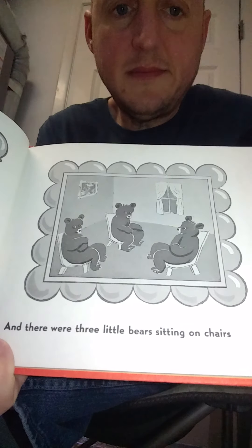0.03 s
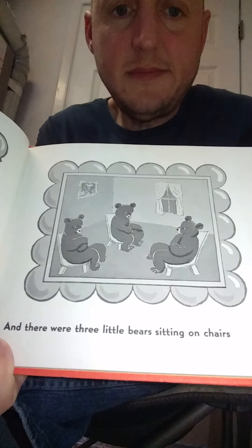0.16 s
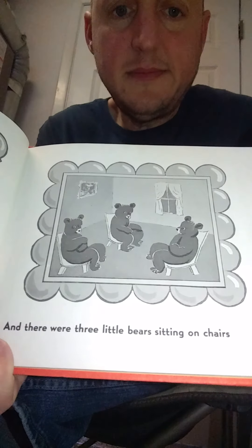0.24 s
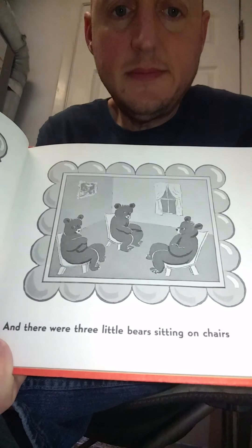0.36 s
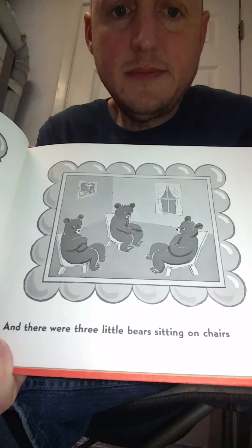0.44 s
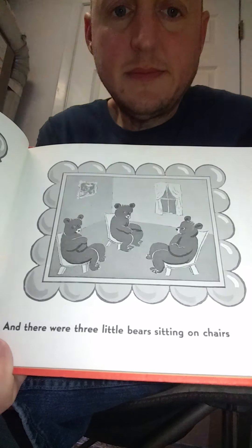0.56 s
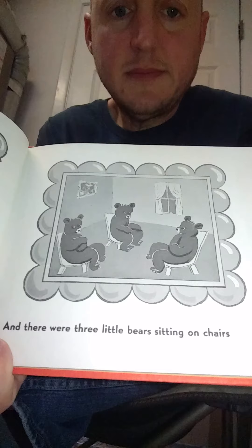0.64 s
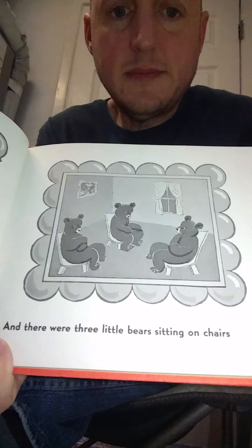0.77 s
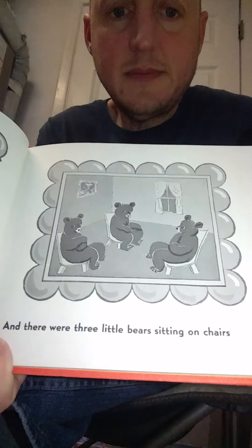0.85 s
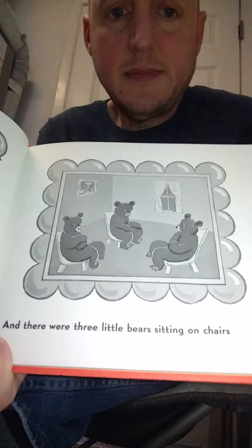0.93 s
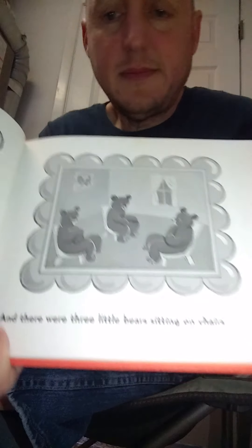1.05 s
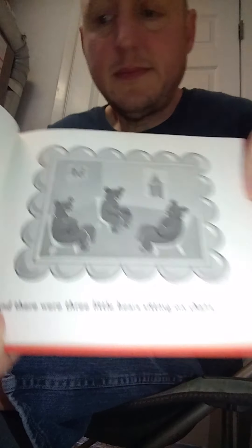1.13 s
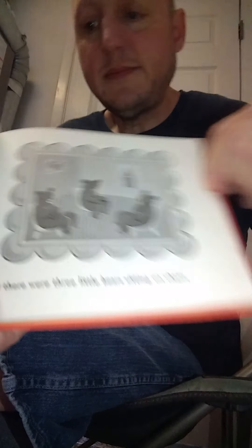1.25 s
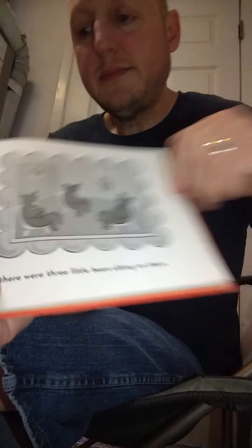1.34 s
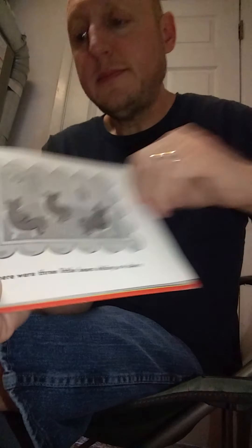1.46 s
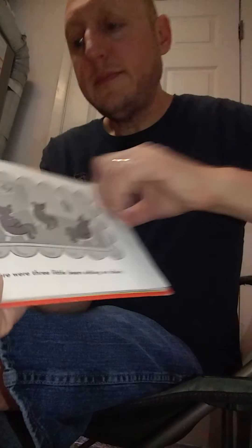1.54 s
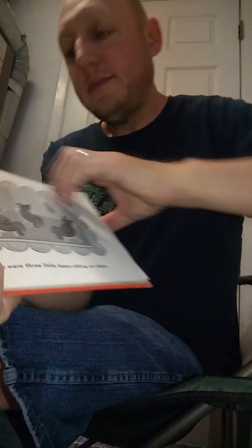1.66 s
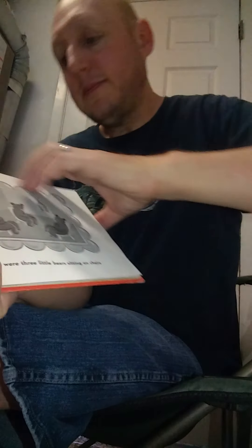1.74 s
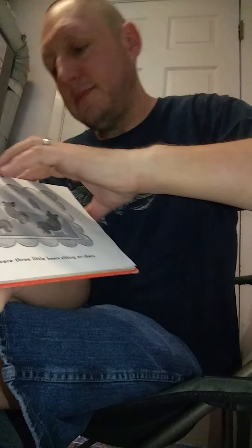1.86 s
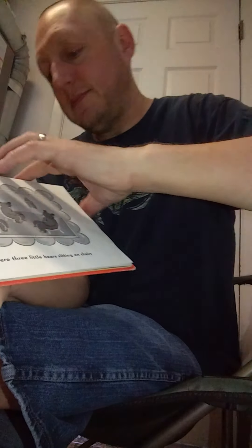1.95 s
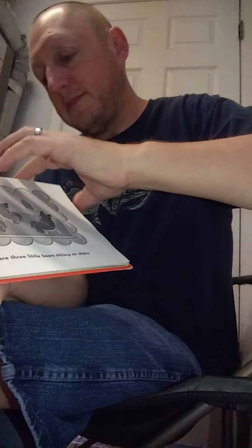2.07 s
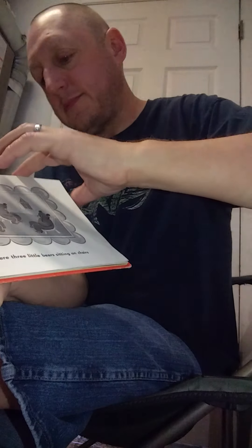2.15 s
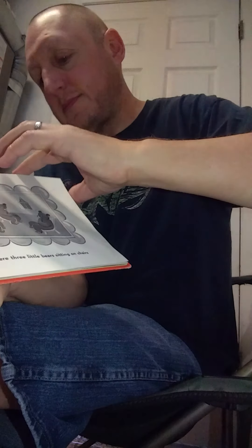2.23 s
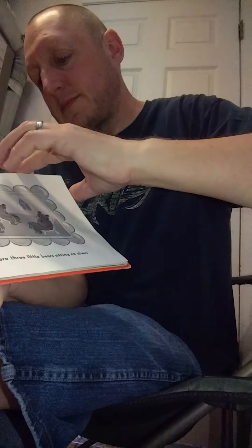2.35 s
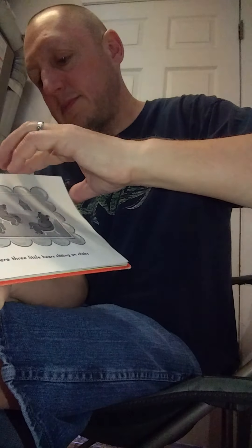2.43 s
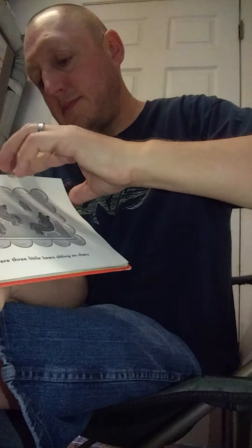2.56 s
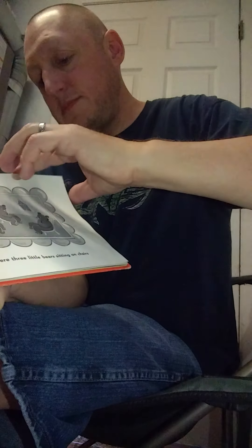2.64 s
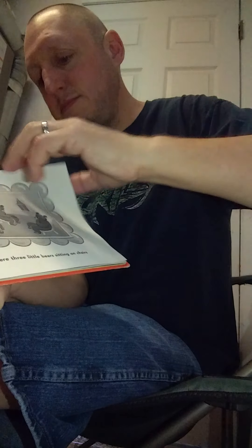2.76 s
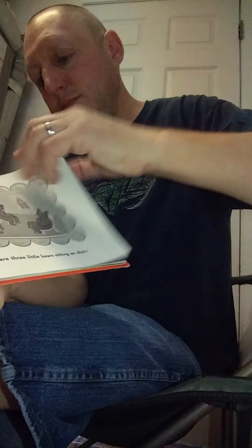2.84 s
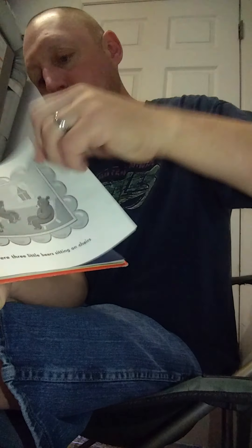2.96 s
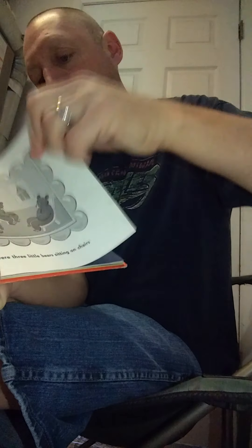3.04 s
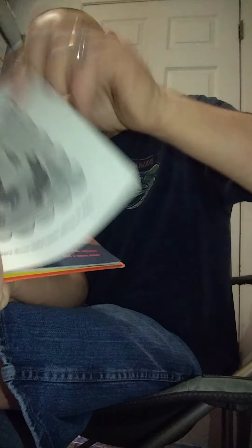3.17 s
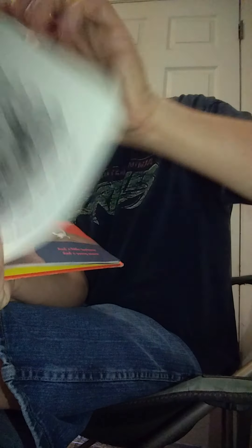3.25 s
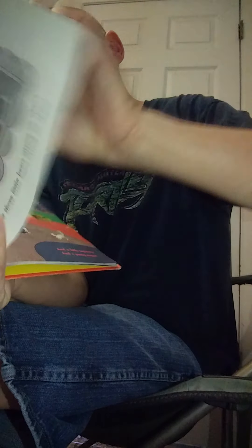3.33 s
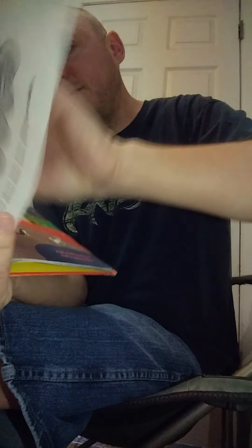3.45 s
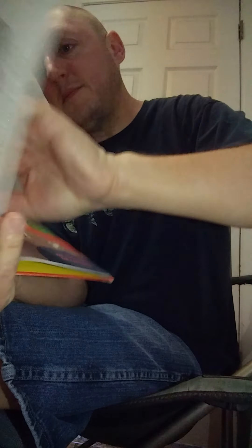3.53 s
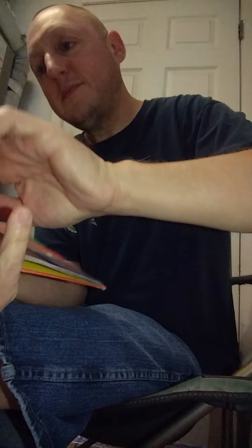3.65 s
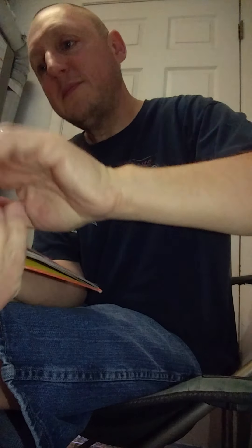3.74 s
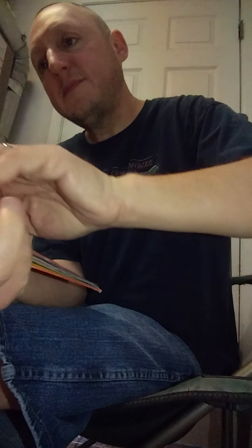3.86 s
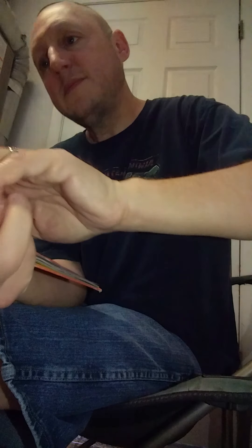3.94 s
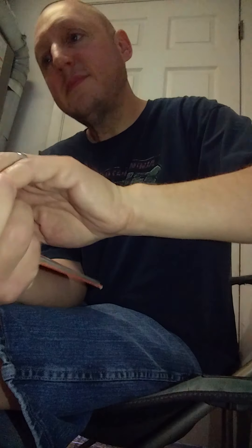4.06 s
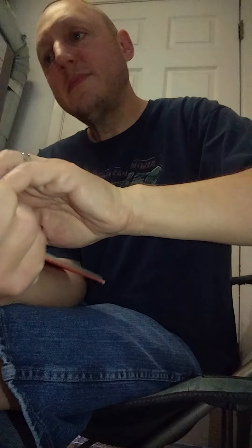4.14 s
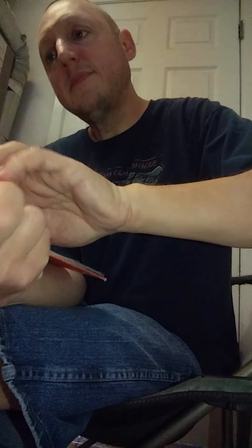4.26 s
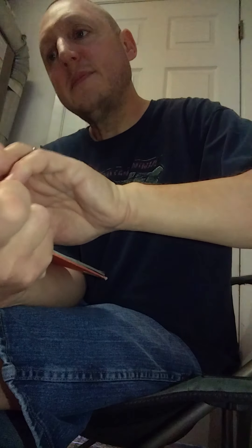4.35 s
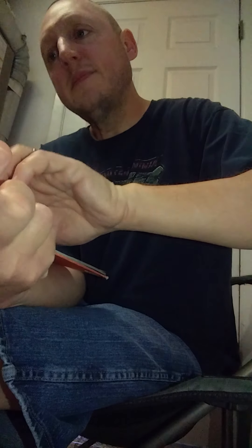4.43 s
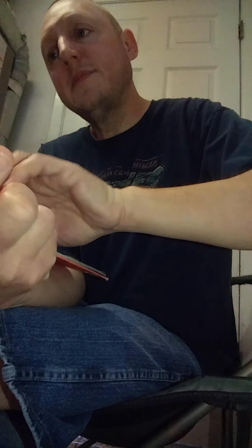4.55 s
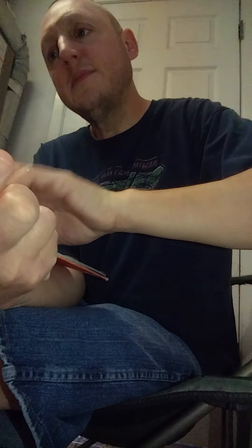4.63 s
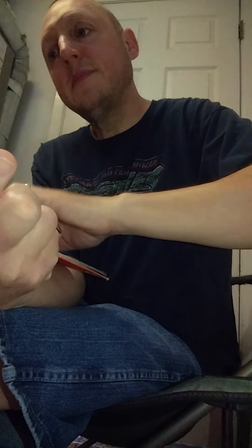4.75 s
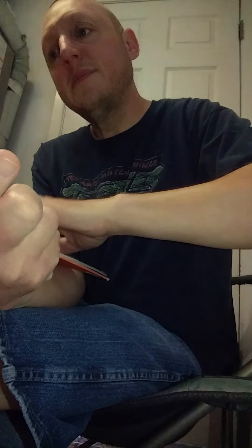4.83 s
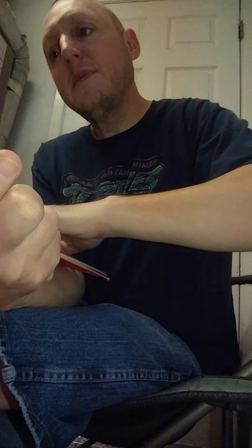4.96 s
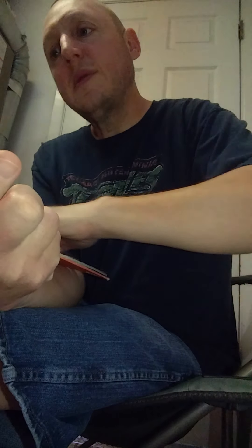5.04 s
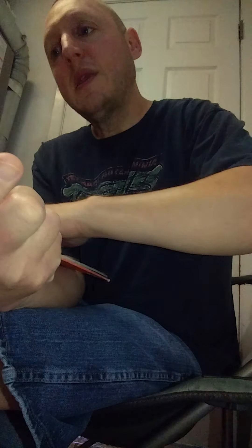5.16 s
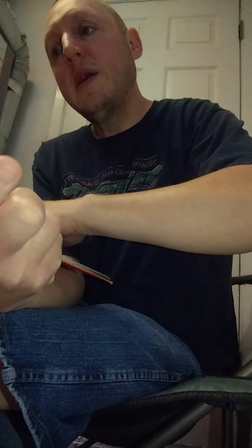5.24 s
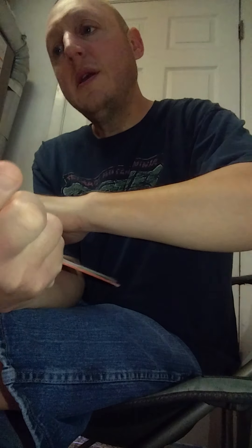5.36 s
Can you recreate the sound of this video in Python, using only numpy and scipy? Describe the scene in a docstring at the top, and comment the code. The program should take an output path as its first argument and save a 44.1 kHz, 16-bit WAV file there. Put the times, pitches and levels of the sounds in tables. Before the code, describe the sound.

Close paper rustling and page turning: soft rubbing, a crackly burst of snaps and cover bumps, then light scrapes over low room hiss.

```python
"""A stiff page of a hardcover book slides and turns under a hand: grainy friction noise with slips.
The lifted page adds a hollow resonance, a low flap and small pops; skin and edges scrape in short bursts.
Paper snaps and soft cover bumps are decaying tone pairs with a noise crack; random taps make the walls.
Behind lie room hiss, a far rumble and a faint wavering mains hum.
Two close microphone ports are subtracted crosswise into a left and a right beam."""
import sys
import numpy as np
from scipy import signal
from scipy.fft import rfft, irfft, next_fast_len
from scipy.io import wavfile
from scipy.ndimage import uniform_filter1d

SR = 44100
rng = np.random.default_rng(int(sys.argv[2]) if len(sys.argv) > 2 else 0)


def master(y):
    """Save y as 16-bit WAV."""
    cut = np.clip(np.atleast_2d(y).T, -1, 1)
    pcm = np.round(cut * 32767)  # scale
    wavfile.write(sys.argv[1], SR, pcm.astype(np.int16))


N = 237919  # length in samples

# All source levels are set ahead of the ports, beams and gain control.
# room hiss colour: f/Hz, level/dB
HISS_COLOUR = [(30, 14.5), (70, 1.5), (130, 15), (300, -6), (600, -6), (1200, -16.5), (3000, -18),
               (6000, -18.5), (10000, -26), (15000, -29)]
# mains hum lines: f/Hz, level/dB (rms, before the waver)
HUM_LINES = [(119.8, -48), (241, -59), (292, -58), (351, -71), (539, -79), (661, -77.5)]
# far rumble: t/s, level/dB
RUMBLE_LEVEL = [(0, -50), (1.0, -58), (1.17, -46), (1.5, -49), (1.65, -54), (1.85, -57), (2.0, -47.5),
                (2.7, -52.5), (3.4, -51), (3.72, -47), (4.15, -73), (4.5, -60), (5.39, -55)]
# decay of the wall reflections: f/Hz, t60/s
WALL_DECAY = [(200, 0.3), (1500, 0.096), (5000, 0.18), (14000, 0.14)]
# likeness of diffuse sound at the two ports: f/Hz, likeness (-1 to 1)
PORT_LIKENESS = [(200, 0.86), (400, 0.7), (1050, 0.66), (1500, 0.36), (2000, -0.34), (2500, 0.29),
                 (3300, -0.81), (4500, -0.91), (6000, -0.0097)]
# soft bumps through the cover: t/s, level/dB, ring f/Hz, t60/s
COVER_BUMPS = [(0.221, -41.5, 288, 0.048), (.409, -46.5, 433, 0.11), (.4355, -43, 600, 0.026),
               (1.181, -33, 272, 0.1), (1.184, -25, 404, 0.083), (1.192, -32, 615, .05),
               (1.487, -29, 170, 0.07), (1.6175, -17, 170, 0.035), (1.6235, -17, 165, 0.035),
               (1.638, -30, 175, 0.07), (2.795, -25.5, 158, 0.077), (3.144, -35, 277, .07),
               (3.263, -7.5, 363, 0.02), (3.497, -31, 273, 0.3), (3.408, -26, 330, .06),
               (3.796, -17, 210, 0.052), (3.803, -22.5, 424, 0.045), (3.926, -28, 271, 0.073),
               (4.416, -30, 258, 0.042)]
# paper snaps and light taps: t/s, level/dB, ring f/Hz, t60/s, crack over ring level/dB
PAPER_SNAPS = [(.218, -42, 900, 0.015, -6), (.307, -41, 3220, 0.008, -18), (.4085, -42, 8600, .01, -15),
               (.4185, -41, 8700, .01, -15), (.898, -42.5, 3450, .01, 0), (1.0195, -39, 1190, .012, -8),
               (1.0455, -36, 1600, .008, 3), (1.1, -36, 865, .012, -9), (1.1778, -24, 1100, 0.01, 2),
               (1.1786, -24, 3700, .008, -8), (1.1787, -18, 1220, .012, -15), (1.181, -18, 1200, .013, -20),
               (1.187, -24, 950, .025, -8), (1.202, -27, 800, .03, -15), (1.219, -31, 3600, .012, -6),
               (1.2595, -23.5, 1550, 0.012, -12), (1.2603, -31, 3200, .008, -8),
               (2.211, -47, 2400, 0.0088, -15), (2.239, -44, 3170, 0.013, -8),
               (2.437, -32, 1630, 0.013, -8), (2.5, -40, 1100, .012, -8), (2.512, -54, 5900, .15, -20),
               (2.6232, -46, 6800, 0.008, 4), (2.677, -42, 1400, 0.02, -10), (2.692, -44, 3800, .012, -6),
               (2.7475, -34, 3400, .01, -6), (2.7968, -17, 3100, .012, -6), (2.7972, -17, 1600, .012, -15),
               (2.8015, -22, 950, .012, -15), (2.813, -25, 1400, .012, -10),
               (2.9115, -21, 1100, 0.014, -13), (2.9284, -12, 1400, 0.007, -8),
               (2.9425, -21, 1450, .012, -15), (2.9465, -22, 1300, .012, -10), (2.957, -21, 1350, .01, -15),
               (2.984, -18, 1350, .015, -25), (2.998, -20, 1300, .012, -25), (3.008, -21, 1350, .012, -25),
               (3.028, -21, 1350, .015, -25), (3.035, -17.5, 1390, 0.014, -28),
               (3.0415, -18, 1400, .015, -25), (3.057, -24, 3300, .012, -10), (3.062, -17, 1450, .012, -20),
               (3.068, -17, 1500, .01, -20), (3.0755, -14, 1320, 0.014, -16), (3.102, -18, 1250, .012, -20),
               (3.131, -20, 800, .014, -10), (3.1452, -13, 1180, 0.014, -18), (3.149, -13, 1150, .018, -20),
               (3.17, -11, 3090, 0.012, -13), (3.189, -6, 1360, 0.01, -12), (3.2445, -22, 3300, .012, -4),
               (3.262, -11, 1038, 0.012, -36), (3.2638, -2, 1050, .013, -20), (3.2715, -20, 1100, .03, -25),
               (3.4088, -12, 1000, 0.025, -12), (3.4095, -17, 3500, .014, -8), (3.455, -26, 950, .04, -20),
               (3.4715, -16, 1200, 0.014, -26), (3.476, -23, 3400, .008, -6),
               (3.4935, -10, 1000, .013, -20), (3.5005, -13, 1150, .013, -15),
               (3.5125, -10, 1150, .018, -25), (3.5185, -13, 1050, .018, -25), (3.8, -11, 3900, .014, -10),
               (3.811, -20, 1500, .012, -10), (3.815, -21, 1100, .015, -12), (3.9, -30, 3300, .015, -15),
               (3.928, -19, 1400, .012, -12), (3.9302, -13, 3400, .012, -1),
               (4.415, -22.5, 1260, 0.0066, -14), (4.4158, -32, 3500, .007, -6),
               (4.484, -34, 1350, .012, -10), (4.55, -34, 1500, .012, -12), (5.2137, -27, 9300, .008, -6),
               (5.2138, -39, 14300, .005, -20), (5.2142, -18, 5800, 0.006, -14),
               (5.2164, -9.5, 4150, 0.007, -30), (5.2184, -18, 4000, .0045, -30)]
# finger and page-edge scrapes: t/s, level/dB, rise/s, hold/s, t60/s, tilt/(dB per octave),
# hollow over scrape level/dB
EDGE_SCRAPES = [(0.407, -47.5, 0.0036, 0.033, 0.28, 8, -8), (0.723, -64, .005, 0.035, 0.087, 2, -4),
                (1.1786, -25.5, 0.00052, 0.0018, 0.17, -7.5, -8.5),
                (1.731, -46.5, 0.0036, 0.035, 0.025, 6.5, -35),
                (1.985, -47.5, 0.039, 0.0056, 0.057, -1, -9), (2.263, -49, 0.0032, 0.011, 0.087, -4.5, -11),
                (2.278, -45, 0.004, 0.024, 0.067, -1, -10.5), (2.405, -41.5, 0.0048, 0.016, 0.035, 0, -6),
                (2.5, -52.5, 0.0023, 0.033, 0.28, 0.5, -1.5), (2.7933, -22, 0.0026, 0.005, 0.027, -3, -6.5),
                (2.9298, -28, 0.00039, 0.0036, 0.057, -6, -4), (3.153, -34.5, 0.0021, 0.005, 0.17, 0, 8),
                (3.17, -44, 0.0024, 0.0027, 0.036, 3, -10), (3.193, -33, 0.0016, 0.005, 0.08, -8, -4),
                (3.406, -26, 0.00069, 0.031, 0.034, -2.5, -5), (3.476, -26, 0.0011, 0.003, 0.094, -5.5, 2),
                (3.49, -29, 0.0064, 0.028, 0.05, -1, 8), (3.531, -32, .006, .02, 0.18, 1, -0.5),
                (3.719, -34.5, 0.0036, 0.028, 0.1, -0.5, -7),
                (3.801, -14.5, 0.0078, 0.0015, 0.037, -3, -12), (3.931, -23, 0.011, 0.0014, 0.071, 0, -8),
                (4.133, -50, .005, 0.04, .092, 1, -18), (4.33, -46.5, 0.028, 0.041, 0.055, 2, -19),
                (4.415, -40, 0.0024, 0.0067, 0.12, -8, -5), (4.558, -43.5, 0.019, 0.081, 0.3, 10, -12.5),
                (4.782, -48, 0.019, 0.03, 0.17, 8, -13), (5.2138, -30, .0002, .004, .01, 1, -30),
                (5.221, -53, 0.001, 0.026, 0.24, -4, -27)]
# colour of the paper fibres: f/Hz, level/dB
FIBRE_COLOUR = [(90, -15), (500, -13), (1200, -23), (2200, -1), (3300, 8), (5500, 4), (8000, 0),
                (11000, -3.5), (15000, -16.5)]
# hand and page sliding: t/s, rub level/dB, lift (hollow over rub) level/dB, hollow f/Hz
PAGE_SLIDE = [(0, -63.5, -4, 1140), (.4, -65.5, -5, 920), (.95, -67, -6.5, 1140), (1.06, -56, -3, 1240),
              (1.25, -43.5, -6, 1260), (1.36, -37.5, -9.5, 1460), (1.52, -36.5, -8.5, 1570),
              (1.64, -45, -8.5, 1250), (1.77, -48.5, -8.5, 1260), (1.82, -56.5, -5, 1260),
              (2.25, -61, -6.5, 1080), (2.66, -65.5, -2, 980), (2.783, -34, -3, 1420),
              (2.83, -42, -0.5, 1340), (2.91, -38, -1.5, 1420), (2.925, -41, -10, 1400),
              (2.94, -39.5, -0.5, 1360), (2.97, -36.5, 1, 1250), (3.05, -33, -0.5, 1390),
              (3.1, -30.5, -3, 1270), (3.14, -27.5, -3, 1150), (3.208, -19.5, -6, 1320),
              (3.245, -30.5, -9.5, 1280), (3.256, -29.5, 0, 1160), (3.29, -43.5, 3, 905),
              (3.38, -39, -4, 930), (3.395, -52.5, -0.5, 1010), (3.46, -46, -1, 915),
              (3.585, -41.5, -8.5, 1030), (3.63, -35, -3.5, 1370), (3.77, -34.5, -2.5, 1270),
              (3.87, -40.5, -7.5, 1340), (3.97, -52.5, -6, 1570), (4.379, -50, -5, 1690),
              (4.44, -45, -6, 1400), (4.495, -41, -9.5, 1440), (4.508, -48.5, -2.5, 1480),
              (4.6, -38.5, -7.5, 1460), (4.63, -46, -6, 1360), (4.7, -43.5, -12.5, 1500),
              (4.95, -57, -9.5, 1190), (5.06, -50, -8, 1450), (5.2, -56.5, -5.5, 1280),
              (5.31, -59, -3.5, 1410), (5.39, -52.5, -5.5, 1230)]
# the way round the housing to the second port: f/Hz, lag/rad (before it wanders)
PORT_LAG = [(900, 0), (1250, .3), (1700, 2.1), (2400, 3.14), (3150, 6.7), (4500, 9.4), (5800, 13.2),
            (7100, 17.5), (8400, 21), (9700, 24.6), (11000, 27.5), (15000, 38)]
# second port against the first: f/Hz, level/dB
FAR_PORT_GAIN = [(130, -1), (400, -4.5), (1000, -4), (1700, 3), (2450, 3), (3100, -2.5), (4500, -21),
                 (7000, 3.5), (12000, 0)]
# strength of the subtracted port: f/Hz, level/dB
CROSS_GAIN = [(2700, -0.46), (3700, 1), (5100, -1.5), (6500, -6), (8500, -4.5), (10300, -5.5), (11500, -11),
              (12500, -9), (13300, -3), (14500, -8)]
# left beam over right: f/Hz, level/dB
BEAM_LEAN = [(2600, 0), (5100, 2), (8000, 2.5), (10500, 2), (12900, 0)]
# bands where what the beams share is removed: f/Hz, half width/Hz
CENTRE_BANDS = [(2530, 230), (12850, 300)]

HISS_DB, WALLS_DB, THUMP_CRACK_DB = -50.5, -7.0, -30
UNEVEN_DB, PATCHY_DB = 1.0, 1.4  # rms wander of the rub
BRIGHT_DB, DULL_PER_LIFT = -8.5, 0.94  # treble tilt in dB per octave; a lifted page sounds duller
# the wider the gap, the lower the hollow and the more the sheet flaps
FLAP_DB, FLAP_DB_PER_OCTAVE, SHUT_HZ = -26.5, 29, 1260
POPS_PER_S, POP_SPREAD_DB = 260., 4.  # the bending sheet buckles in small pops
POP_DB, POP_PER_LIFT = -9.5, 2.5  # pops over the rub; a lifted page pops more
HOLLOW_WIDTH_HZ, SCRAPE_HOLLOW_WIDTH_HZ, POP_WIDTH_HZ = 1710, 2200, 380  # of each resonator pass
BEAM_DELAY_S, LOW_CUT_HZ, EDGE_HZ = .000391, 55, 15420


def amp(db):
    """dB to gain."""
    return 10 ** (np.asarray(db) / 20)


def evened(x):
    """Scales to rms 1."""
    return x / np.sqrt(np.mean(x ** 2) + 1e-20)


def read(points, hz):
    """Reads a table on a log-frequency axis."""
    f, value = np.transpose(points)
    return np.interp(np.log(hz + 1), np.log(f + 1), value)


def add(mix, s, sound):
    """Mixes a sound in at time s."""
    part = mix[round(s * SR):][:len(sound)]
    part += sound[:len(part)]


def shaped(x, response):
    """Filters x by a function of frequency."""
    size = next_fast_len(x.shape[-1] + 512)
    spectrum = rfft(x, size) * response(np.fft.rfftfreq(size, 1 / SR))
    return irfft(spectrum, size)[..., :x.shape[-1]]


def drift(count, size):
    """Slow random wander of rms 1."""
    once = uniform_filter1d(rng.standard_normal(count), size)
    return evened(uniform_filter1d(once, size))


def patchwork(shape, bins):
    """Random patches of rms 1 over frequency and time, a few bins high and 5 frames long."""
    smooth = uniform_filter1d(rng.standard_normal(shape), size=5, axis=1)
    return evened(uniform_filter1d(smooth, size=bins, axis=0))


def resonate(x, hz, width_hz):
    """A gliding resonator: shifts the curve hz down to zero, smooths, and shifts back."""
    turn = np.exp(2j * np.pi * np.cumsum(hz) / SR)
    r = np.exp(-np.pi * width_hz / SR)
    return 2 * (turn * signal.lfilter([1 - r], [1, -r], x / turn)).real


def hollow_of(drive, pitch_hz, width_hz):
    """A broad, steep resonance of rms 1 from two resonator passes, as in the air gap under the page."""
    once = resonate(drive, pitch_hz, width_hz)
    return evened(resonate(once, pitch_hz, width_hz))


def random_sizes(count, spread_db, most):
    """Pulse sizes of random sign whose dB values follow a capped exponential law."""
    size = amp(spread_db * np.minimum(rng.exponential(1, count), most))
    return size * rng.choice([-1, 1], count)


def grit(count, slips_per_s, spread_db, share):
    """Smooth friction noise plus stick-slip clicks of very uneven size."""
    # only some samples hold a slip
    slips = random_sizes(count, spread_db, most=3.5) * (rng.random(count) < slips_per_s / SR)
    return evened(rng.standard_normal(count) + share * evened(slips))


def diffuse(pair):
    """Makes two unrelated signals as alike as diffuse sound is at the two ports."""
    def like(hz):
        return np.clip(read(PORT_LIKENESS, hz), -1, 1)
    far = shaped(pair[0], like) + shaped(pair[1], lambda hz: np.sqrt(1 - like(hz) ** 2))
    return np.array([pair[0], far])


def room_hiss():
    """Steady coloured noise arriving at the two ports as a diffuse field."""
    noise = shaped(rng.standard_normal((2, N)), lambda f: amp(read(HISS_COLOUR, f)))
    return amp(HISS_DB) * evened(diffuse(noise))


def mains_hum():
    """Steady-pitched sine lines, each wavering in level on its own."""
    t, hum = np.arange(N) / SR, np.zeros(N)
    for hz, db in HUM_LINES:
        waver_db = 2.8 * drift(N, size=1500)
        hum += amp(db + waver_db) * np.sqrt(2) * np.sin(2 * np.pi * (hz * t + rng.random()))
    return hum


def far_rumble():
    """Noise through a low resonance, following a level curve."""
    rumble = hollow_of(rng.standard_normal(N), np.full(N, 82.), 99)
    return rumble * amp(np.interp(np.arange(N) / SR, *np.transpose(RUMBLE_LEVEL)))


def walls(x):
    """Sparse taps of random sign, each band dying at its own speed; the paths change as the book moves."""
    out, turn = np.zeros((2, N)), 2 * np.pi * 1.31 * np.arange(N) / SR
    for k in range(3):
        taps, at = np.zeros((2, SR // 3)), np.arange(100, SR // 3 - 20, 20)
        at = at + rng.integers(0, 20, (2, len(at)))
        np.put_along_axis(taps, at, rng.choice([-1., 1.], at.shape), 1)
        hz, t, z = signal.stft(taps, SR, nperseg=256)
        z *= amp(-60 * t / read(WALL_DECAY, hz)[:, None])
        tail = diffuse(signal.istft(z, SR, nperseg=256)[1])
        # the three tails take turns at steady total power
        fed = x * np.sqrt(2 / 3) * np.cos(turn + np.pi * k / 3)
        out += signal.fftconvolve(fed[None], tail / np.linalg.norm(tail[0]), axes=1)[:, :N]
    return out


def knocks(table, soft_cycles, spread):
    """Each blow cracks briefly and rings a pair of tones, spread apart as a ratio, after a soft start."""
    out, t = np.zeros(N), np.arange(0, .2, 1 / SR)
    for s, db, hz, t60, crack_db in table:
        ring = np.sin(2 * np.pi * hz * t) + 0.25 * np.sin(2 * np.pi * hz * spread * t)
        ring *= amp(-60 * t / max(t60, .003)) * (1 - np.exp(-t * hz / soft_cycles))
        splinters = rng.standard_normal(len(t)) * amp(-60 * t / 0.0045)
        sharp_break = np.arange(len(t)) == 8  # a single sample
        burst = 2.6 * (splinters / np.linalg.norm(splinters) + sharp_break)
        crack = shaped(burst, lambda f: amp(read(FIBRE_COLOUR, f)))
        add(out, s, amp(db) * (ring + amp(crack_db) * crack))
    return out


def cover_thumps():
    """Low knocks through the cover, with a second tone below the first and a faint crack."""
    return knocks([(*row, THUMP_CRACK_DB) for row in COVER_BUMPS], soft_cycles=0.5, spread=0.59)


def paper_snaps():
    """Snaps and taps of the sheet, with a second tone just above the first."""
    return knocks(PAPER_SNAPS, soft_cycles=0.66, spread=1.2)


def scrapes():
    """Bursts of grit that swell, hold and die, and sound in the hollow under the page."""
    out, t = np.zeros(N), np.arange(-.04, .26, 1 / SR)
    times, _, _, hollow_hz = np.transpose(PAGE_SLIDE)
    for s, db, rise, hold, t60, tilt_db, hollow_db in EDGE_SCRAPES:
        drive = grit(len(t), 3000., spread_db=3., share=.7)

        def colour(f):
            return amp(read(FIBRE_COLOUR, f) + tilt_db * np.log2(np.maximum(f, 350) / 3000))
        burst = evened(shaped(drive, colour))
        pitch_hz = np.interp(s + t, times, hollow_hz)
        burst += amp(hollow_db) * hollow_of(drive, pitch_hz, SCRAPE_HOLLOW_WIDTH_HZ)
        swell = np.exp(np.minimum(t, 0) / max(rise, 1e-4))
        decay = amp(-60 * np.maximum(t - hold, 0) / max(t60, .01))
        add(out, s + t[0], amp(db) * swell * decay * burst)
    return out


def rubbed_fibres(drive, s, rub_db, bright_db):
    """Grit coloured by the paper fibres, with treble tilt and level moving as the page slides."""
    coloured = evened(shaped(drive, lambda f: amp(read(FIBRE_COLOUR, f))))
    hz, frames, z = signal.stft(coloured, SR, nperseg=256)
    octaves = np.clip(np.log2((hz + 1) / 3800), -.4, 1.6)[:, None]
    z *= amp(np.interp(frames, s, rub_db) + octaves * np.interp(frames, s, bright_db))
    z *= amp(PATCHY_DB * patchwork(z.shape, bins=9))  # fibres catch now here, now there
    return signal.istft(z, SR, nperseg=256)[1][:N]


def buckling_pops(pitch_hz):
    """Random pulses of the bending sheet, ringing narrowly near the wandering hollow pitch."""
    pulses = random_sizes(N, POP_SPREAD_DB, most=3) * (rng.random(N) < POPS_PER_S / SR)
    return hollow_of(pulses, pitch_hz * (1 + 0.048 * drift(N, size=200)), POP_WIDTH_HZ)


def page_slide():
    """One friction drive sounds the fibres, the hollow and the flapping sheet; pops ride on top."""
    s, rub_db, lift_db, hollow_hz = np.transpose(PAGE_SLIDE)
    bright_db = BRIGHT_DB - DULL_PER_LIFT * lift_db
    flap_db = FLAP_DB + lift_db + FLAP_DB_PER_OCTAVE * np.log2(SHUT_HZ / hollow_hz)
    pop_db = POP_DB + POP_PER_LIFT * lift_db
    t = np.arange(N) / SR
    pitch_hz = np.interp(t, s, hollow_hz)
    drive = grit(N, 2500., spread_db=3., share=.45)
    drive *= amp(UNEVEN_DB * drift(N, size=300))  # uneven pressure
    out = rubbed_fibres(drive, s, rub_db, bright_db)
    hollow = hollow_of(drive, pitch_hz, HOLLOW_WIDTH_HZ)
    flap = hollow_of(drive, np.full(N, 480.), 490)
    for layer, over_rub_db in ((hollow, lift_db), (flap, flap_db), (buckling_pops(pitch_hz), pop_db)):
        out += layer * amp(np.interp(t, s, rub_db + over_rub_db))
    return out


def second_port(book):
    """The book arrives later here, by a lag that grows with frequency and shifts as hands move."""
    hz, frames, z = signal.stft(book, SR, nperseg=256)
    lag = np.outer(np.interp(hz, *np.transpose(PORT_LAG)), 1 + .04 * drift(len(frames), size=16))
    # a page sounds from many spots at once, which scatters the treble phase
    lag += np.clip((hz[:, None] - 1900) / 1400, 0, 1.1) * patchwork(z.shape, bins=5)
    return signal.istft(z * np.exp(-1j * lag), SR, nperseg=256)[1][:N]


def scene():
    """The book, its walls and the room air at both ports; the housing shades the second."""
    book = cover_thumps() + paper_snaps() + scrapes() + page_slide()
    air = room_hiss() + mains_hum() + far_rumble()
    ports = np.array([book, second_port(book)]) + amp(WALLS_DB) * walls(book) + air
    return np.array([ports[0], shaped(ports[1], lambda f: amp(read(FAR_PORT_GAIN, f)))])


def record(dry):
    """Crosswise delay-and-subtract beams, slow gain control, low cut and band limit."""
    def cross(f):
        return amp(read(CROSS_GAIN, f)) * np.exp(-2j * np.pi * f * BEAM_DELAY_S)

    def lean_and_low_cut(f):
        lean = amp(np.outer([.5, -.5], read(BEAM_LEAN, f)))
        return lean * f ** 2 / np.hypot(f ** 2, LOW_CUT_HZ ** 2)

    def centre(f):
        return sum(np.exp(-((f - hz) / width_hz) ** 4) for hz, width_hz in CENTRE_BANDS)
    beams = shaped(dry - shaped(dry[::-1], cross), lean_and_low_cut)
    beams = beams - shaped(beams.mean(0), centre)
    power = abs(uniform_filter1d((beams ** 2).mean(0), 2000))
    power_db = 10 * np.log10(power + 1e-12)
    fall = np.arange(N) * 10.0 / SR  # the held level falls 10 dB a second
    held_db = np.maximum.accumulate(power_db + fall) - fall
    over_db = np.maximum(held_db + 36.0, 0)  # threshold -36 dB
    ducked = beams / amp(0.32 * uniform_filter1d(over_db, 2000))
    band_limit = signal.firwin(301, EDGE_HZ, window=("kaiser", 9), fs=SR)
    return signal.oaconvolve(ducked, band_limit[None], "same")


dry = scene()
out = record(dry)
master(out)
```